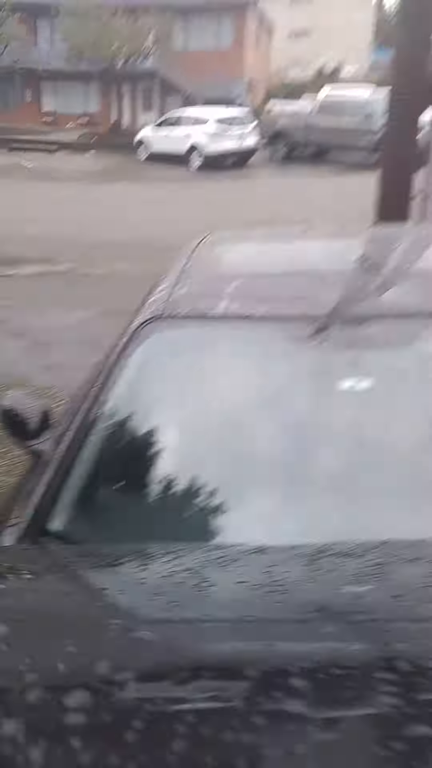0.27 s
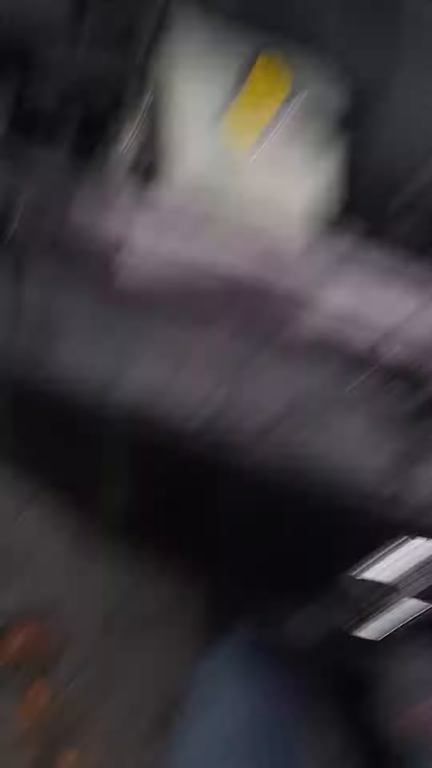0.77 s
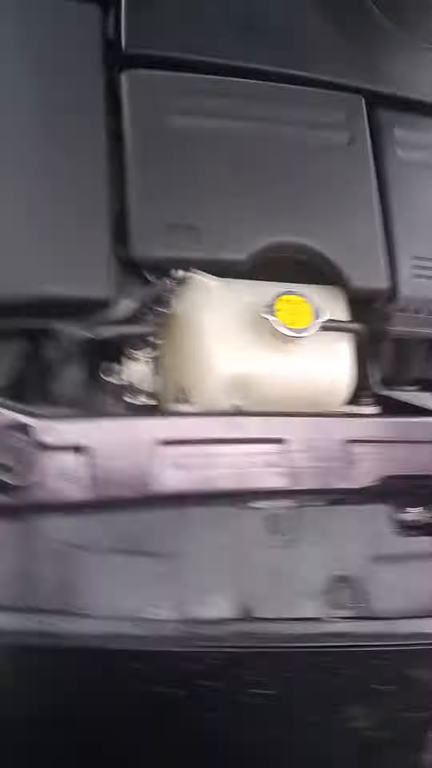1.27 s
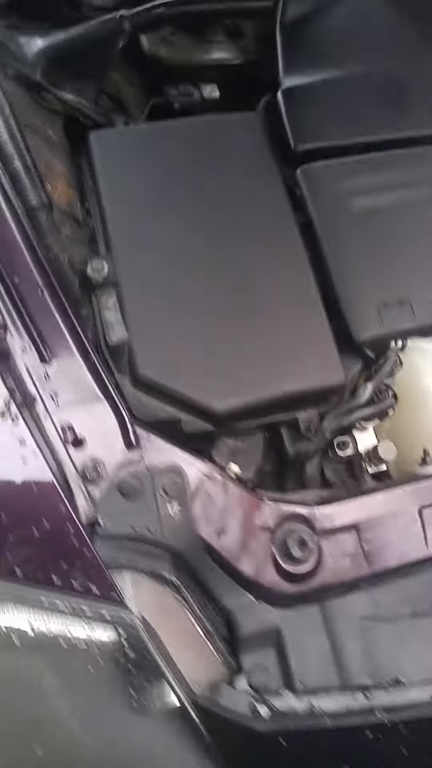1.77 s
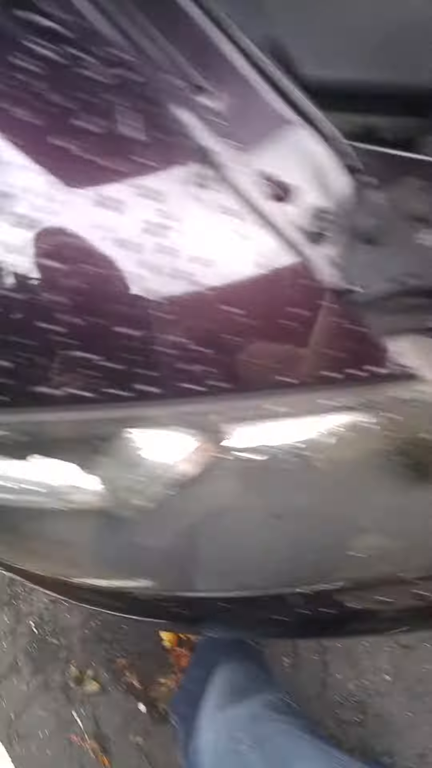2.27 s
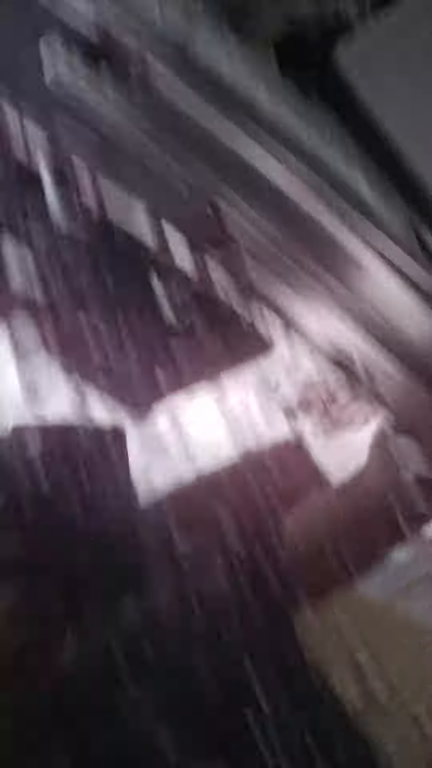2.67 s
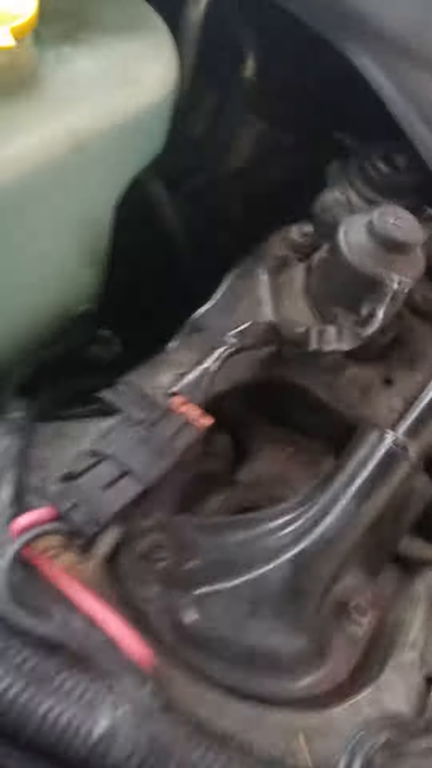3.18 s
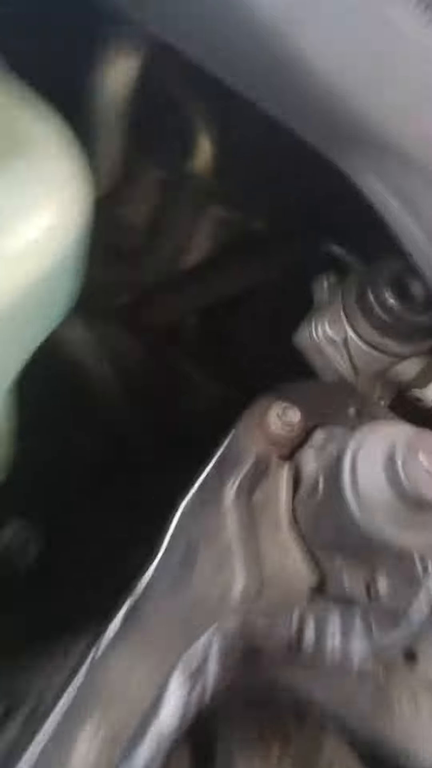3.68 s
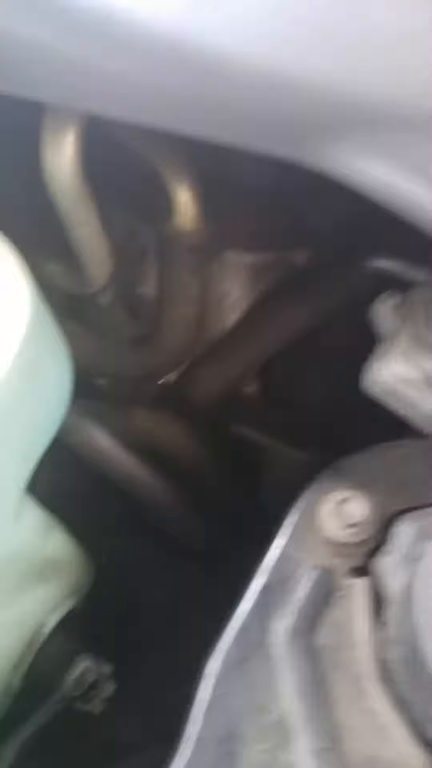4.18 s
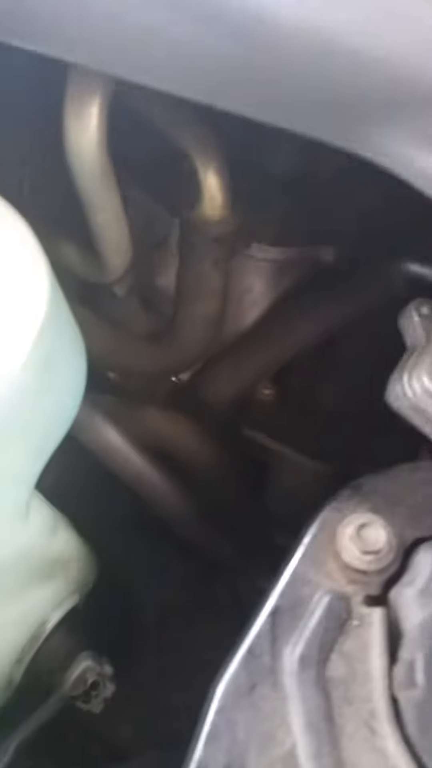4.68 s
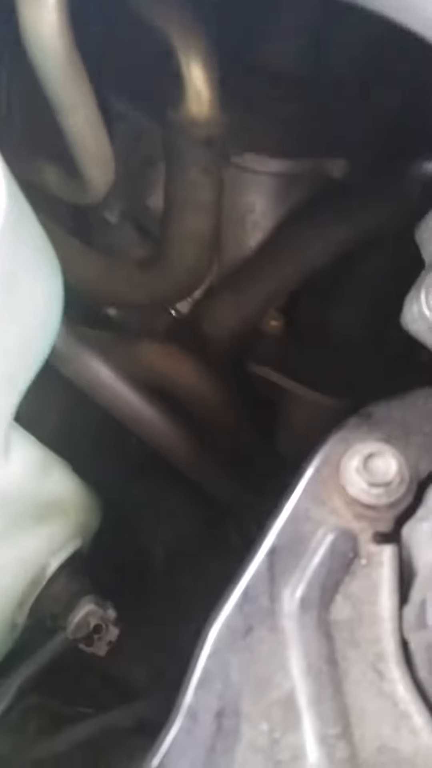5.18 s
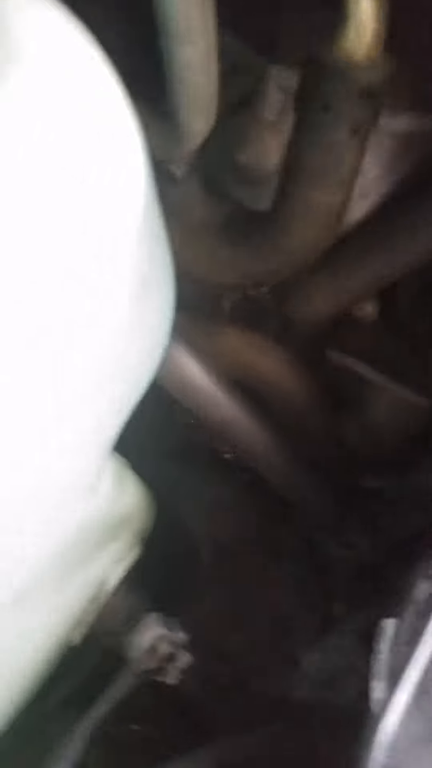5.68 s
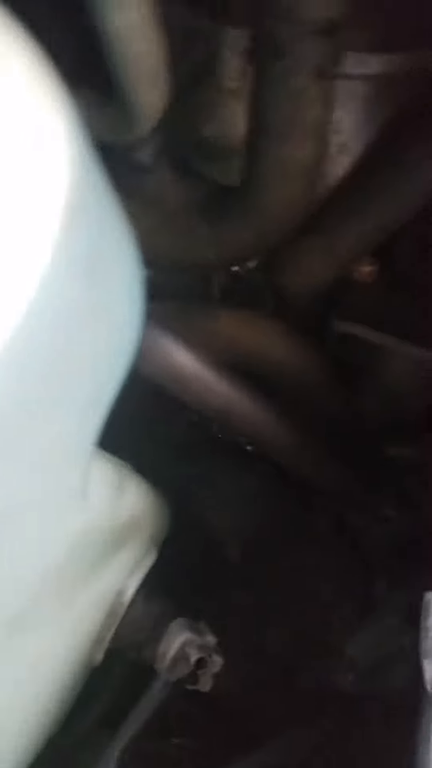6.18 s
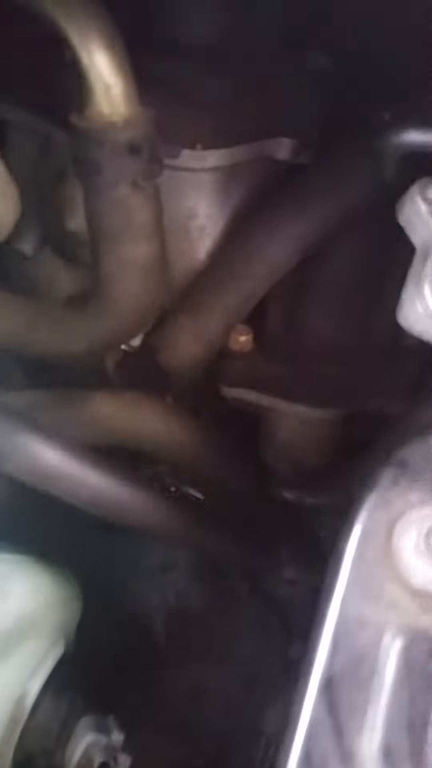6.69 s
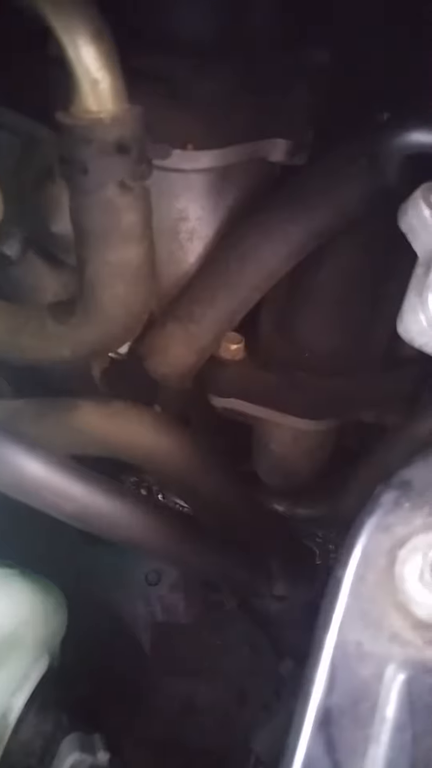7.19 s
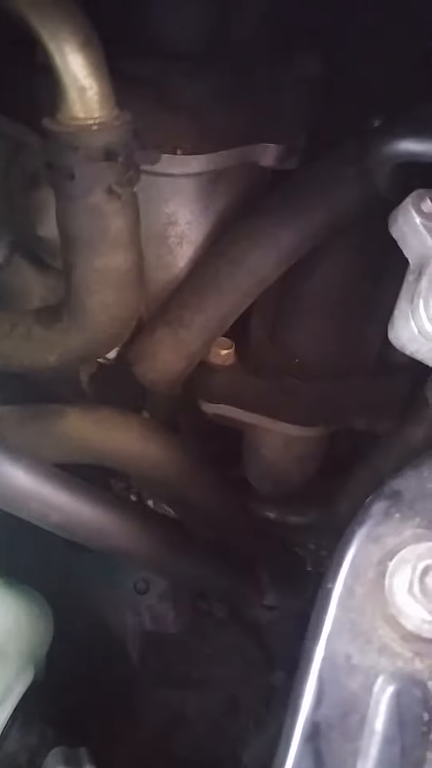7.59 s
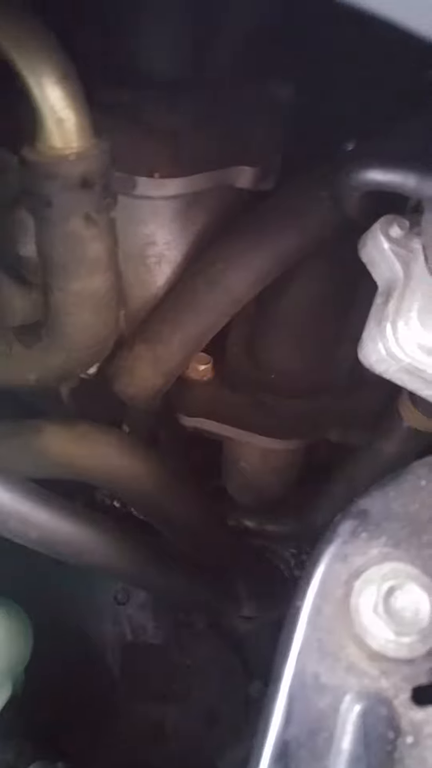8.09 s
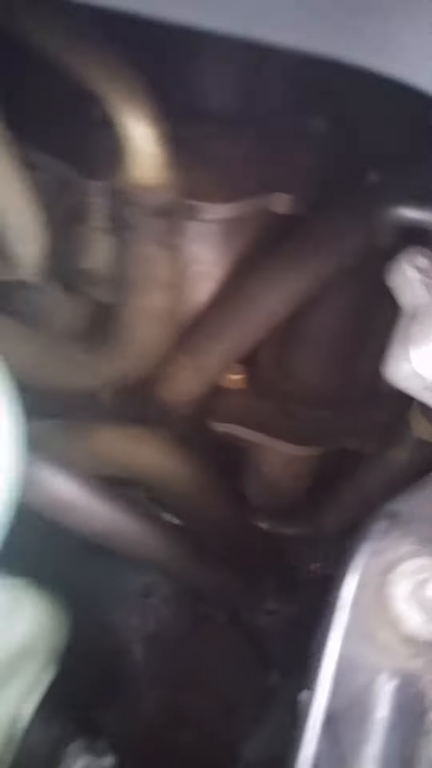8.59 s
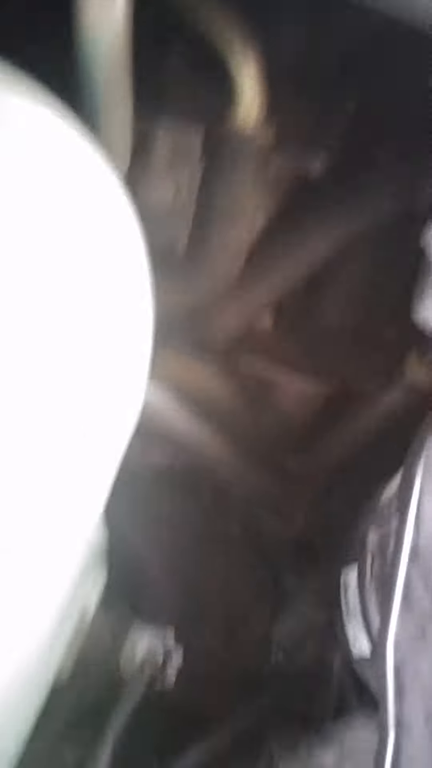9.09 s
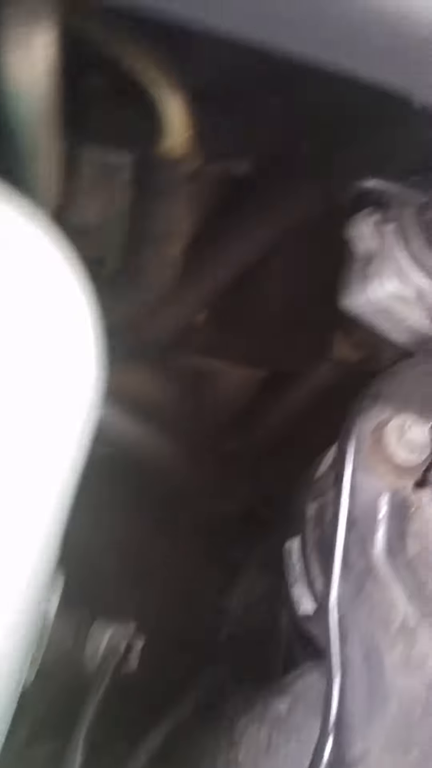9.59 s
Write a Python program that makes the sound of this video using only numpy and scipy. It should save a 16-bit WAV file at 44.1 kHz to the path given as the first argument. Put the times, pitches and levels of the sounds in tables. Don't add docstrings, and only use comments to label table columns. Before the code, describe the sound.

Close, loud engine idle: a deep humming drone with hollow metallic ticking, a rumbling body and breathy, fluttering air hiss. The handheld microphone moves from outside into the engine bay, shifting knocks and hiss between left and right. The speed drops, recovers briefly and eases down, with faint thin electrical whines coming and going later.

```python
import sys
import numpy as np
from scipy import signal
from scipy.io import wavfile
from scipy.ndimage import uniform_filter1d

SR = 44100
rng = np.random.default_rng(int(sys.argv[2]) if len(sys.argv) > 2 else 0)


def wav_out(sig):
    wavfile.write(sys.argv[1], SR, np.round(np.clip(np.atleast_2d(sig).T, -1, 1) * 32767).astype(np.int16))


def to_linear_factor(level_db):
    exponent = np.asarray(level_db, float) / 20
    return 10 ** exponent


N = 434385
LEFT_RIGHT = np.array([[.5], [-.5]])
THIN = 8


def evened(x):
    return x / np.sqrt(np.mean(np.abs(x) ** 2) + 1e-20)


def curves(rows):
    s, *columns = np.transpose(rows)
    return [np.interp(np.arange(N) / SR, s, column) for column in columns]


def filled(x):
    return signal.resample_poly(x, THIN, 1, axis=1)[:, :N]


def wander(seconds, channels=1, every=1):
    step = 32
    size = max(round(seconds * SR / step), 2)
    slow = rng.standard_normal((channels, N // step + 2))
    slow = evened(uniform_filter1d(uniform_filter1d(slow, size), size))
    return np.array([np.interp(np.arange(0, N, every) / step, np.arange(len(v)), v) for v in slow])


def air(shape, same, patchy_db):
    hz = np.fft.rfftfreq(1024, 1 / SR)
    shape_hz, shape_db = np.transpose(shape)
    a, b, c, d, patches = rng.standard_normal((N // 256 + 5, 513, 5)).T
    patches = uniform_filter1d(patches, size=10, axis=0)
    patches = evened(uniform_filter1d(patches, size=12, axis=1))
    same = np.clip(same, 0, 1)
    left = a + 1j * b
    right = same * left + np.sqrt(1 - same ** 2) * (c + 1j * d)
    level_db = np.interp(np.log(hz + 1), np.log(shape_hz), shape_db, -120, -120)
    z = np.array([left, right]) * to_linear_factor(level_db[:, None] + patchy_db * patches)
    return evened(signal.istft(z, nperseg=1024, noverlap=768)[1][:, :N])


ENTER_S, ENTER_LENGTH_S, ENTER_DEPTH, SETTLED_S = 2.1, .2, .6, 5.5


def depth():
    return np.interp(np.arange(N) / SR, [ENTER_S, ENTER_S + ENTER_LENGTH_S, SETTLED_S], [0, ENTER_DEPTH, 1])


# (time [s], speed [shaft turns per s])
SHAFT_SPEED = [(0.0, 28.5), (0.5, 28.85), (1.2, 28.75), (1.5, 27.9), (1.95, 28.12), (2.5, 26.1),
               (2.8, 25.7), (3.2, 26.2), (3.7, 28.3), (4.1, 29.02), (4.75, 28.27), (5.05, 27.98),
               (5.5, 27.06), (5.8, 27.2), (6.25, 26.88), (8.0, 26.67), (9.2, 25.68), (9.85, 26.1)]


def shaft():
    start_turns, stumble_s, stumble_turns = .0225, 1.325, -.041
    stumble = stumble_turns * np.clip((np.arange(N) / SR - stumble_s) * 200, 0, 1)
    return start_turns + np.cumsum(curves(SHAFT_SPEED)[0]) / SR + stumble


# (frequency [Hz], density [dB per Hz])
RUMBLE_SHAPE = [(25, -46), (45, -30), (70, -18), (130, 1), (250, 1), (400, -7), (500, -5.5), (1100, -11)]
# (level outside [dB], gain inside the bay [dB])
RUMBLE_LEVELS = [(-31, -17), (-36, 6.5)]


def rumble():
    deep_db, rest_db = [db + inside_db * depth() for db, inside_db in RUMBLE_LEVELS]
    deep = air([(20, -45), (40, -32), (65, 7), (90, 13), (120, -30)], same=.96, patchy_db=2)
    rest = air(RUMBLE_SHAPE, same=0.73, patchy_db=-2.5)
    return to_linear_factor(deep_db - 12) * deep + to_linear_factor(rest_db) * rest


# (shaft order [cycles per turn], level [dB])
BELT_LINES = [(48, -57), (74.8, -52)]
# (start [s], length [s],
# level [dB], frequency [Hz])
STEADY_TONES = [(5.3, 1.55, -47, 1300), (6.9, 0.91, -45.5, 1411), (9.2, 0.49, -52, 1411),
                (9.6, .3, -48, 1411), (8.85, 1.0, -45.5, 1080)]


def whine(turns):
    fade_s = 0.15
    t = np.arange(0, N, THIN) / SR
    lines = [(to_linear_factor(db), order * turns[::THIN]) for order, db in BELT_LINES]
    for start, length, db, hz in STEADY_TONES:
        to_edge = np.minimum(t - start, start + length - t)
        lines.append((to_linear_factor(db) * np.clip(to_edge / fade_s + .5, 0, 1), hz * t))
    out = 0
    for gain, cycles in lines:
        apart = rng.uniform(0.24, 0.32) * LEFT_RIGHT
        flutter = to_linear_factor(7.0 + 1.9 * wander(0.063, every=THIN))
        phase = 2 * np.pi * (cycles + apart) + .5 * wander(.05, every=THIN)
        out = out + gain * flutter * np.cos(phase)
    return filled(out)


# (time [s], level [dB], frequency [Hz])
CASE_BUMPS = [
    (1.325, -25, 168),
    (1.344, -14, 183),
    (1.364, -9, 137),
    (4.497, -11, 200),
]


def bumps():
    out = np.zeros(N)
    t = np.arange(3000) / SR
    for s, db, hz in CASE_BUMPS:
        out[round(s * SR):][:3000] += to_linear_factor(db - 60 * t / 0.07) * np.sin(2 * np.pi * hz * t)
    return out


# (time [s], hiss heard [dB], left minus right [dB])
HISS_HEARD = [(0.0, -36, -16), (0.3, -27.5, -10), (0.74, -24, -2.5), (0.9, -28.5, 3.5), (1.97, -30.5, 3),
              (2.58, -32, 8.5), (3.68, -28, 3), (3.92, -27, -0.5), (4.94, -28.5, -1), (6.01, -27, 4),
              (6.86, -28.5, 0.5), (8.89, -29, 0), (9.6, -28, 2.5), (9.85, -28, 1)]
# (frequency [Hz], density [dB per Hz])
INTAKE_SHAPE = [(2240, -31), (3800, -16), (4480, -10), (4870, -11), (6140, -0.5), (6970, 0), (7680, -3),
                (8460, 2.5), (11500, -10), (12900, -11.5), (15200, -11), (15700, -10), (16200, -47)]
# (frequency [Hz], density [dB per Hz])
BELT_CLATTER_SHAPE = [(560, -13), (950, -3.5), (1150, -6.5), (1390, -8.5), (1480, -8.5), (2100, -8),
                      (2930, -14), (3560, -18), (4500, -23), (5850, -49), (9900, -120)]
# (place in the turn [turns], swell [dB], decay [turns])
PORT_PUFFS = [(.53, 4, 0.19), (.73, 5.5, 0.14), (.22, 2.5, .1), (.05, 4, .08)]


def hiss(turns):
    heard_db, pan_db = curves(HISS_HEARD)
    speed = curves(SHAFT_SPEED)[0]
    near_db = heard_db - heard_db.mean()
    gate_db = 0.94 * wander(0.0023)[0]
    for place, db, decay in PORT_PUFFS:
        since = turns - place
        strength = rng.uniform(0.48, 1.65, int(turns[-1]) + 3)[np.floor(since).astype(int) + 1]
        gate_db = gate_db + db * strength * np.exp(-(since % 1) / decay)
    pulsing = .4 + 0.6 * depth() ** 2.0

    full = air(INTAKE_SHAPE, same=0.041, patchy_db=1.0)
    low = signal.oaconvolve(full, signal.firwin(255, 10500, fs=SR)[None], "same")
    intake = to_linear_factor(-28 + near_db) * evened(low * to_linear_factor(pulsing * gate_db))
    top_db = -37 + 0.71 * near_db + 2 * (depth() - 0.76)
    top = to_linear_factor(top_db) * evened((full - low) * to_linear_factor(0.49 * pulsing * gate_db))

    clatter = evened(air(BELT_CLATTER_SHAPE, same=0.027, patchy_db=1.5) * to_linear_factor(0.2 * gate_db))
    clatter_db = 1.06 * (speed - speed.mean()) + 1 * (depth() - 0.73)
    clatter = clatter * to_linear_factor(clatter_db - 37.5 + 0.48 * near_db + LEFT_RIGHT * -1.5)
    return to_linear_factor(3.5) * ((intake + top) * to_linear_factor(LEFT_RIGHT * pan_db) + clatter)


# (time [s], blows heard [dB], left minus right [dB], upper over low ring [dB])
KNOCK_HEARD = [(0.0, -28.5, -8.5, 0.5), (0.44, -27.5, -8, 2), (0.76, -22.5, 7, 4), (0.93, -30, -9.5, -9),
               (1.15, -27, 8, -9), (1.43, -22, 7, -1), (1.92, -19.5, 4.0, -1.5), (2.14, -20, 6, 5.5),
               (2.3, -30, 10, -1), (2.66, -21, 5, 1.5), (3.07, -22.5, -1.5, 1), (3.54, -22, -5.0, 9.5),
               (3.84, -27.5, -7.5, -12), (4.91, -26, -6.5, -2.5), (5.13, -23, -2.5, 3.5),
               (8.53, -25.5, -5.5, -3.5), (9.22, -26, -4, -4), (9.85, -24.5, -5, -1)]
# (frequency [Hz], width [Hz])
HOUSING_RINGS = [
    (615, 105),
    (735, 115),
    (880, 130),
]
# (place in the turn [turns], level [dB])
ROTOR_BLOWS = [(.05, -1), (.205, -10), (.55, -.5), (.72, -10), (.365, -12), (.89, -12)]


def knock(turns):
    even_speed, uneven_span, early_turns = 28.2, 1.2, .02
    blow_db, pan_db, tilt_db = curves(KNOCK_HEARD)
    speed = curves(SHAFT_SPEED)[0]
    top_db = -16 - 2.5 * (speed - speed.mean()) + 6 * depth()
    low_lead = .3 + .28 * pan_db
    high_lead = low_lead + 2.4 * depth() ** 3

    blows = np.zeros(N)
    ahead = turns + early_turns * np.clip((even_speed - speed) / uneven_span, 0, 1)
    for place, db in ROTOR_BLOWS:
        luck = rng.standard_normal((int(turns[-1]) + 1, 2))
        clock = ahead if place > .5 else turns
        at = np.searchsorted(clock, np.arange(len(luck)) + place + .0015 * luck[:, 0])
        blows[np.minimum(at, N - 1)] += to_linear_factor(db + 2.5 * luck[:, 1])
    scatter = uniform_filter1d(blows, size=500) * rng.standard_normal((2, N))
    drive = evened(blows) + 0.4 * evened(scatter) + 0.28 * rng.standard_normal((2, N))

    out = np.zeros((2, N))
    ring_levels = (-tilt_db / 2, tilt_db / 2, top_db)
    for (hz, width), db, lead in zip(HOUSING_RINGS, ring_levels, (low_lead, high_lead, high_lead)):
        pole = np.exp((2j * hz - width) * np.pi / SR)
        ring = signal.lfilter([1], np.poly([pole, pole]), drive + 0j)
        ring = evened((ring * np.exp(1j * LEFT_RIGHT * lead)).real)
        out = to_linear_factor(db) * ring - out
    out = signal.sosfilt(signal.butter(6, 528, "high", fs=SR, output="sos"), out)
    return out * to_linear_factor(blow_db - 1.5 + LEFT_RIGHT * pan_db)


# (time [s], drone heard [dB], left minus right [dB])
DRONE_HEARD = [(0.0, -16, -2.0), (0.02, -18, -1.5), (0.44, -15.5, -2), (0.71, -14.5, 0.5),
               (0.79, -15.5, 1.0), (1.43, -18.5, 1), (2.22, -19, 1.5), (3.48, -17, 1), (3.81, -16, -0.5),
               (4.28, -17.5, -2.0), (5.93, -16, -0.5), (6.78, -16, -2.0), (8.5, -17, -2.5),
               (9.41, -16.5, -0.5), (9.82, -16.5, -1.5), (9.85, -18, -1.5)]
# (shaft order [cycles per turn], level outside [dB], gain inside the bay [dB])
DRONE_ORDERS = [(2, -23, -6.5), (4, -16.5, 0), (6, 0.5, 0), (8, -15.5, 1), (10, -27.5, 10), (12, -24.5, 8),
                (14, -27.5, 6), (16, -23.5, 4.5), (18, -34.5, 11), (20, -38, 13.5), (3, -39.5, 11.5),
                (5, -36.5, 7), (7, -42, 10.5), (9, -38, 11.5), (11, -40.5, 11), (13, -62, -12),
                (15, -60, 5), (17, -48.5, 16.5)]
# (frequency [Hz], width [Hz], gain [dB])
BAY_RESONANCES = [(111, 2.3, 7.5), (220, 5.7, -14), (224, 9.5, 9.5), (273.6, 7.6, 4), (303, 7.2, 4),
                  (344.7, 8.3, -21), (409.3, 2.7, -29), (494, 4.7, -30)]


def drone(turns):
    pass_s, pass_length_s, pass_db = 3.35, 0.23, 7
    pass_hz, pass_width_hz = 289, 37
    tracks = np.array([*curves(SHAFT_SPEED), *curves(DRONE_HEARD), depth()])
    speed, drone_db, pan_db, deep = tracks[:, ::THIN]
    inside = np.minimum(deep / ENTER_DEPTH, 1)
    lead_ms = pan_db * (0.3148 - 0.2 * deep)
    angle = 2 * np.pi * (turns[::THIN] + LEFT_RIGHT * lead_ms / 1000 * speed)
    hz = np.arange(700.)
    bay_db = sum(db * np.exp(-.5 * ((hz - f) / width) ** 2) for f, width, db in BAY_RESONANCES)
    t = np.arange(0, N, THIN) / SR
    passing_db = pass_db * np.exp(-.5 * ((t - pass_s) / pass_length_s) ** 2)
    out = 0
    for k, db, inside_db in DRONE_ORDERS:
        k = round(k)
        shake = wander(0.015, channels=2, every=THIN) * min(abs(k - 6) + 0.49, 3)
        hollow = np.exp(-.5 * ((k * speed.mean() - pass_hz) / pass_width_hz) ** 2)
        level_db = db + inside_db * inside + np.interp(k * speed, hz, bay_db) + passing_db * hollow
        smear = .35 * max(k - 8, 0) ** 2
        phase = k * angle + 1.39 * (k - 6) + smear + 0.076 * shake[1]
        out = out + to_linear_factor(level_db + .5 * shake[0]) * np.cos(phase)
    return filled(np.sqrt(2) * out * to_linear_factor(drone_db + LEFT_RIGHT * pan_db))


def scene():
    turns = shaft()
    return rumble() + whine(turns) + bumps() + hiss(turns) + knock(turns) + drone(turns)


def roll_off(x):
    return signal.sosfilt(signal.butter(12, 16720, fs=SR, output="sos"), x)


def record(dry):
    limited = np.tanh(dry / 1.652) * 1.498
    return roll_off(limited)


dry = scene()
out = record(dry)
wav_out(out)
```